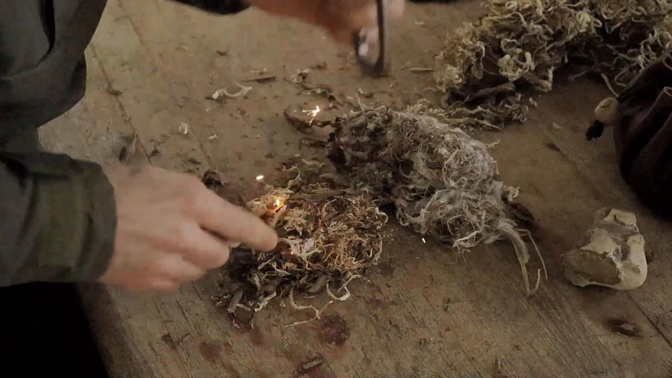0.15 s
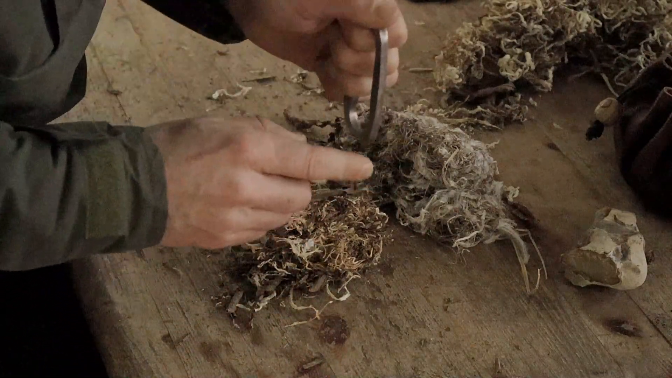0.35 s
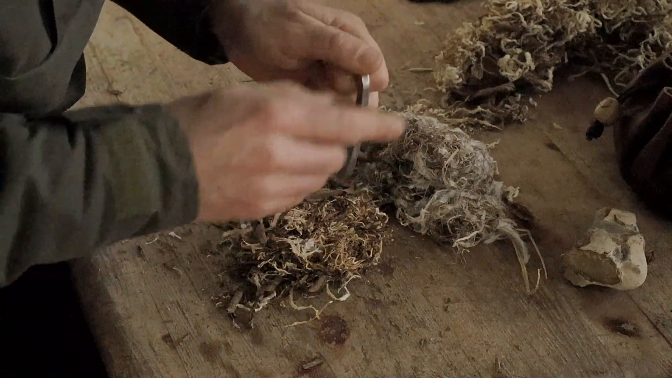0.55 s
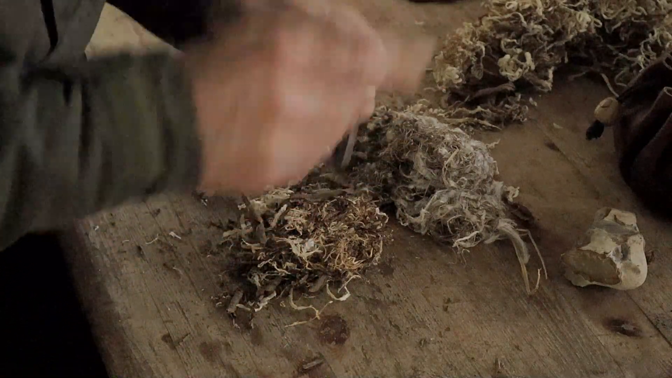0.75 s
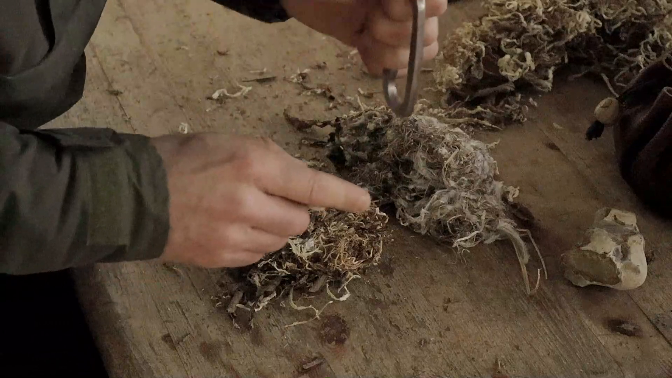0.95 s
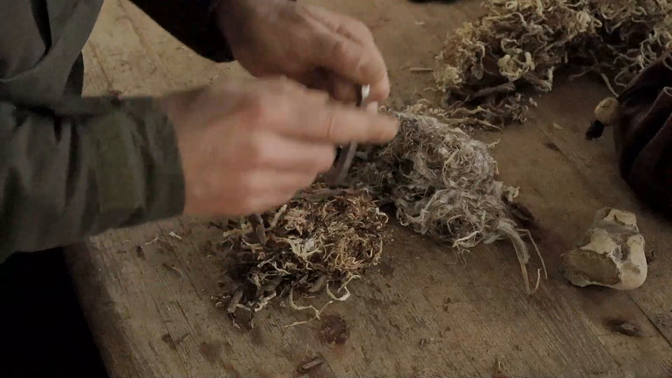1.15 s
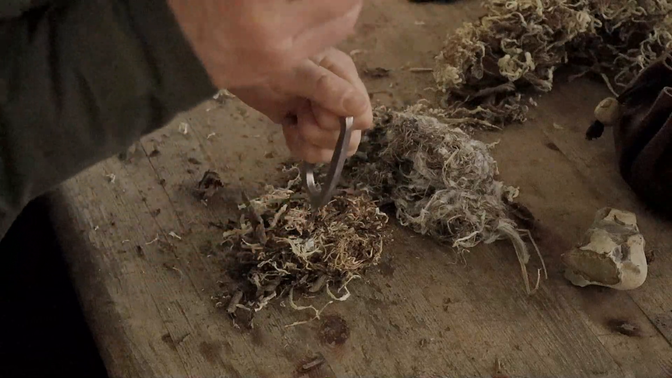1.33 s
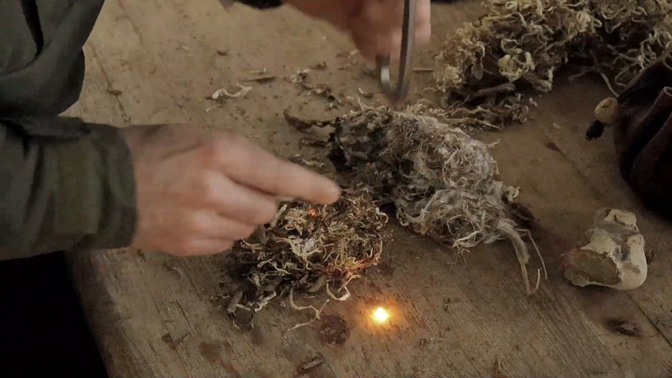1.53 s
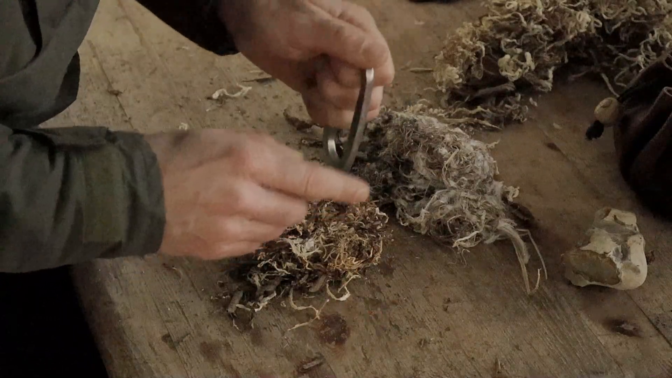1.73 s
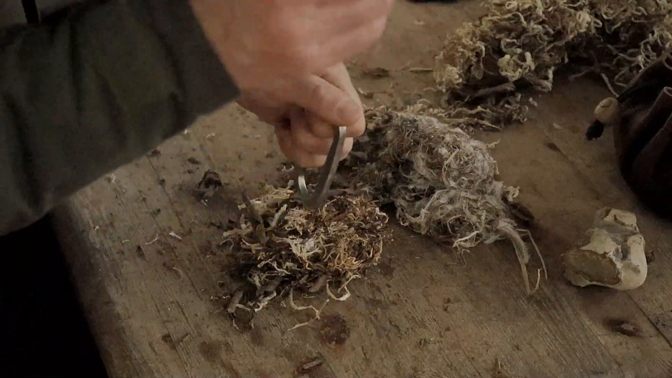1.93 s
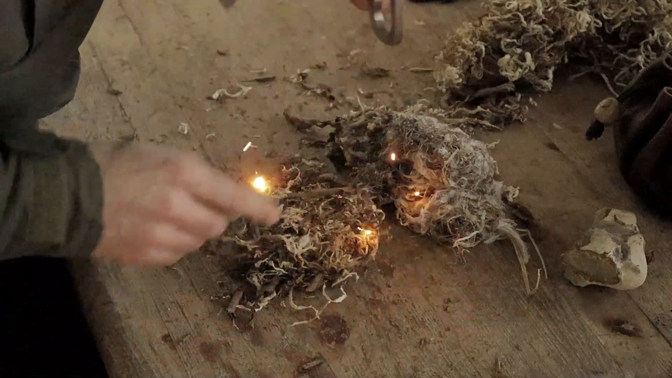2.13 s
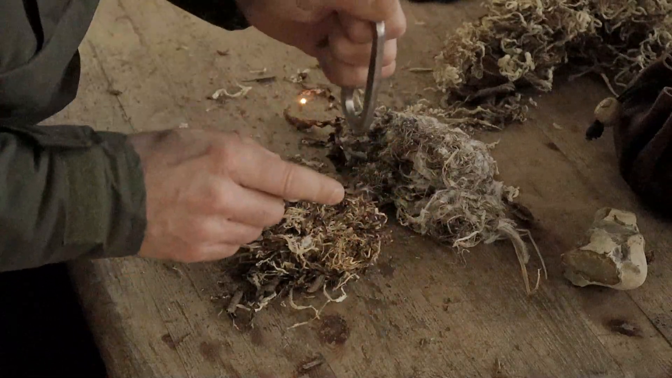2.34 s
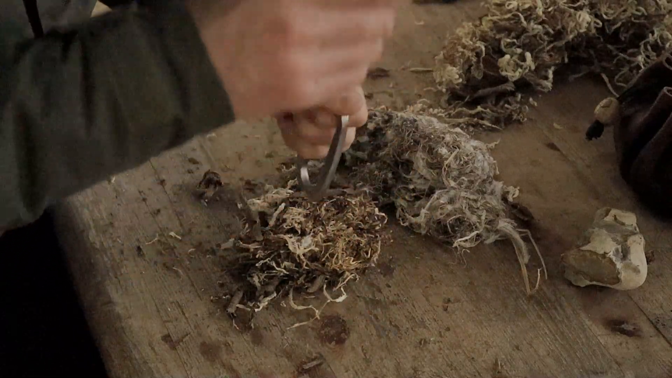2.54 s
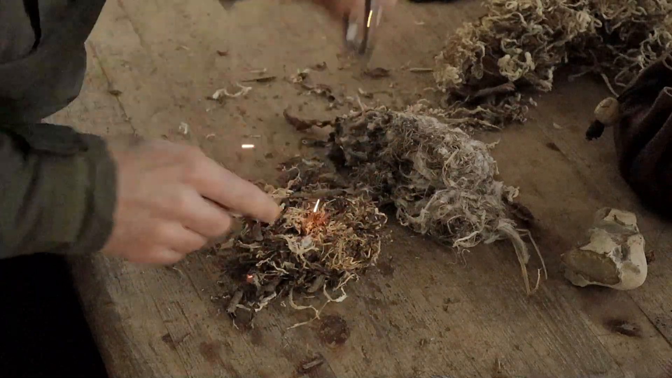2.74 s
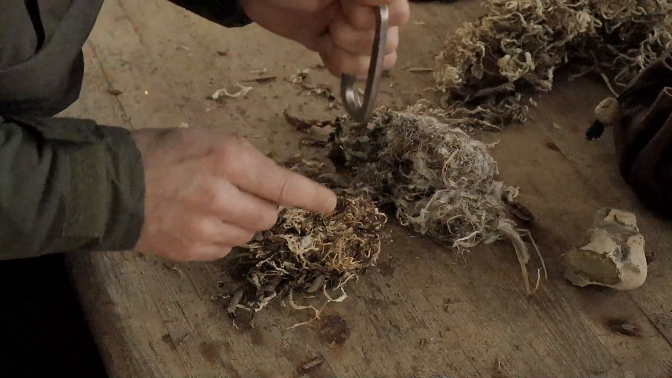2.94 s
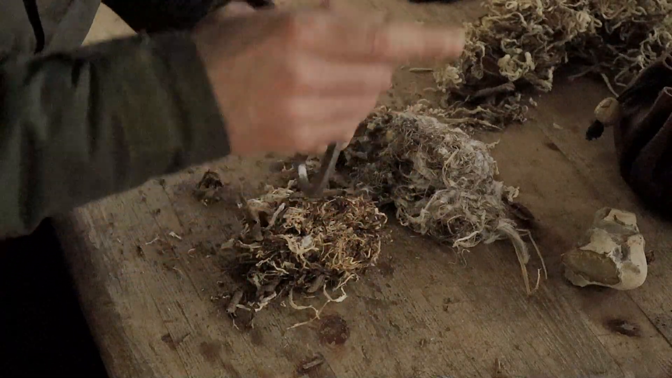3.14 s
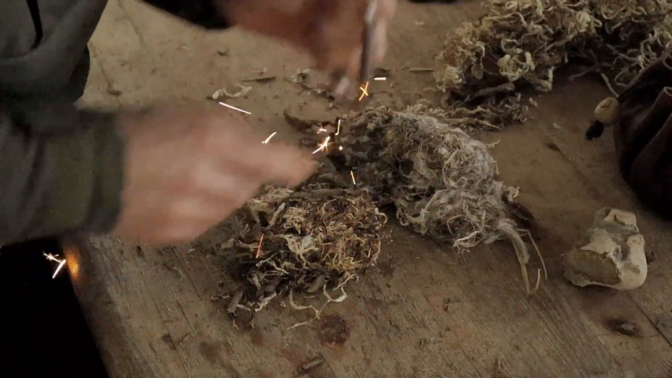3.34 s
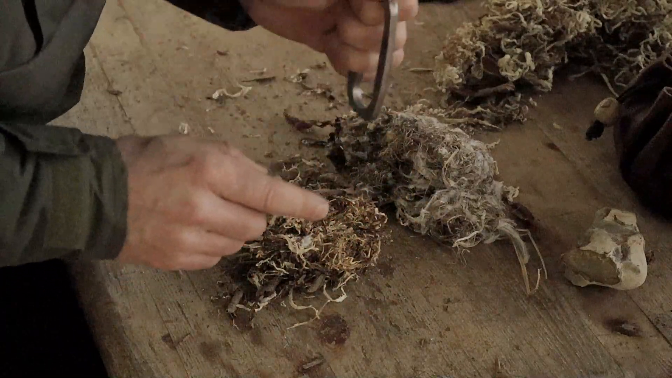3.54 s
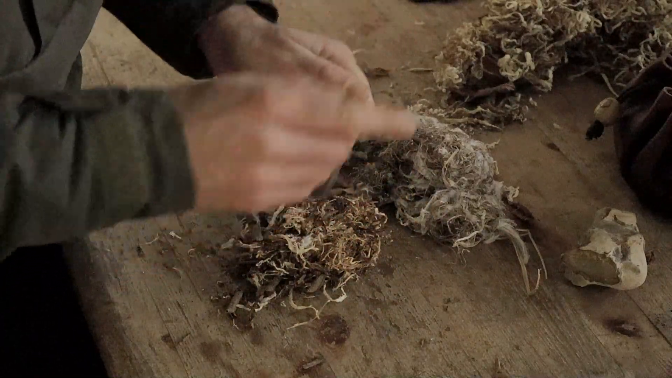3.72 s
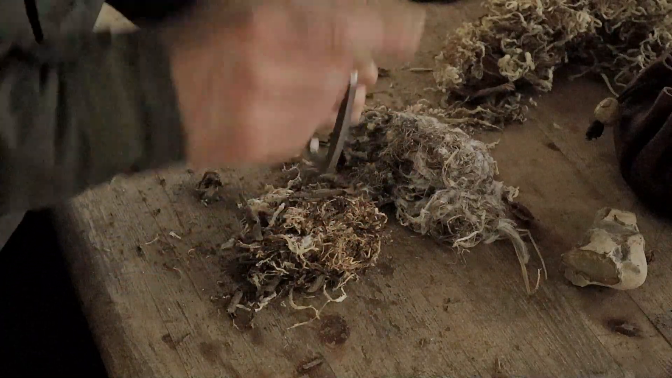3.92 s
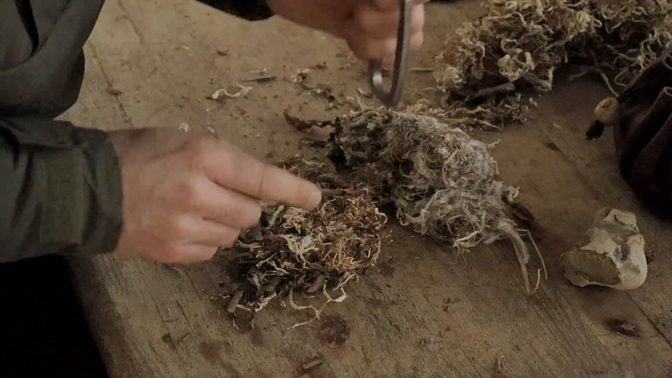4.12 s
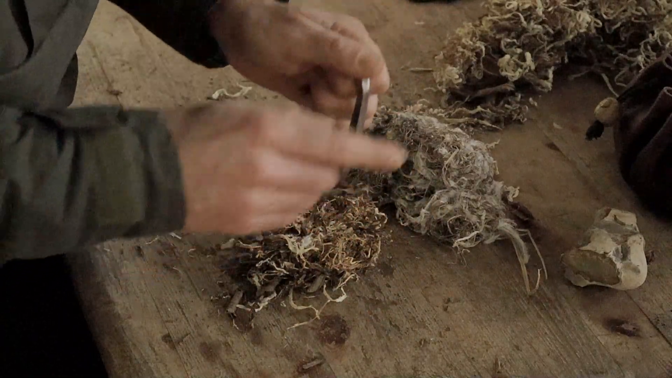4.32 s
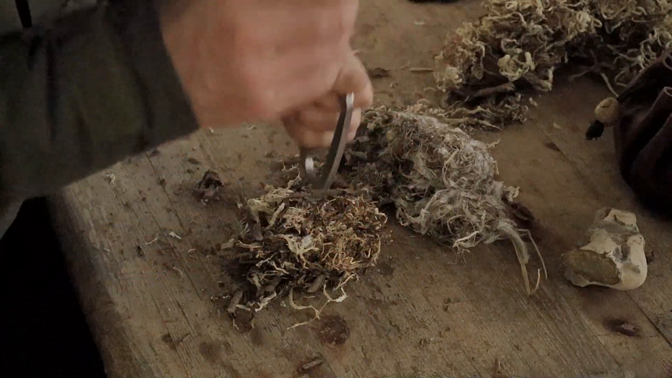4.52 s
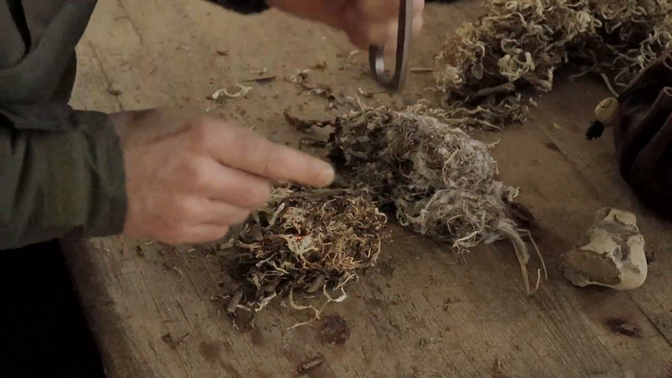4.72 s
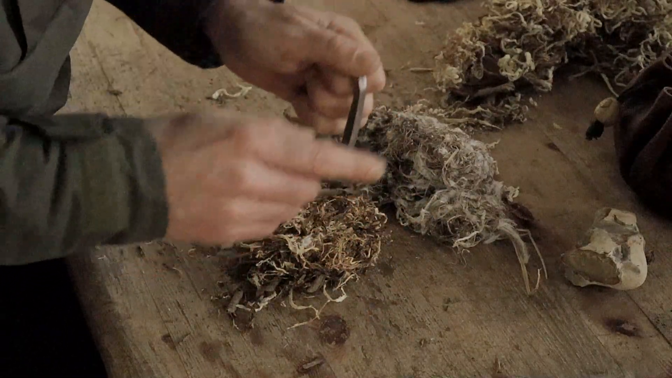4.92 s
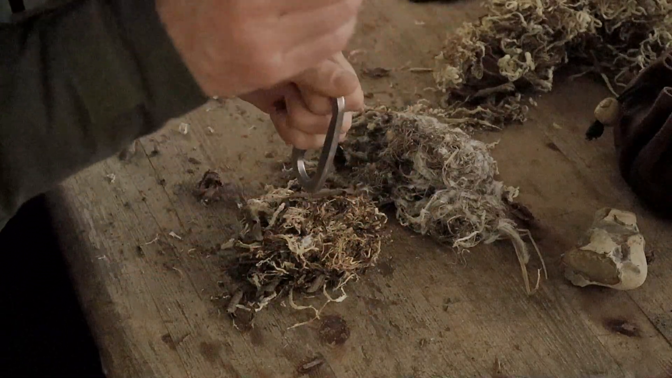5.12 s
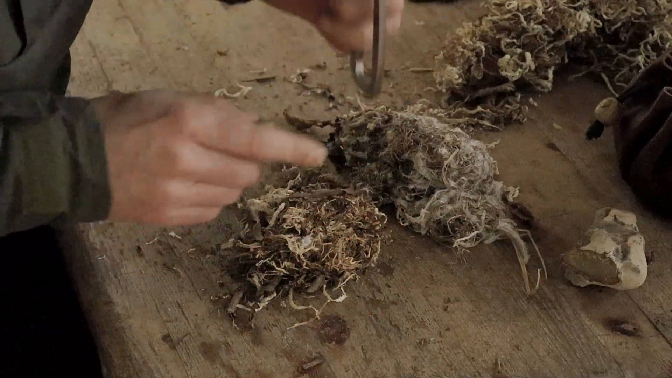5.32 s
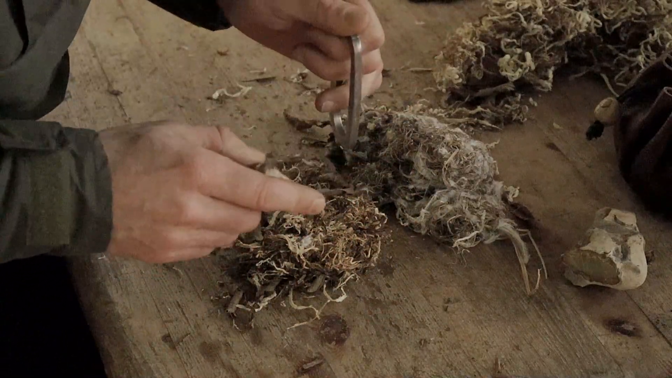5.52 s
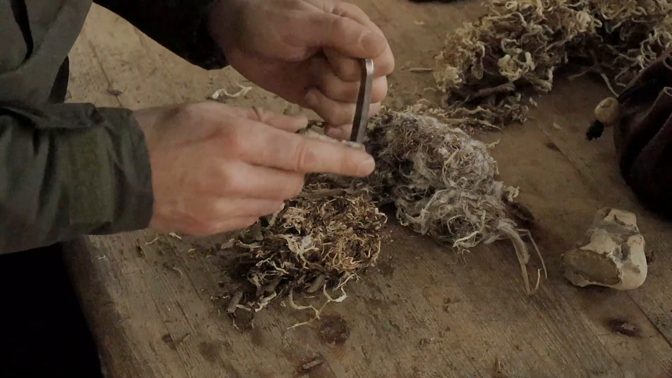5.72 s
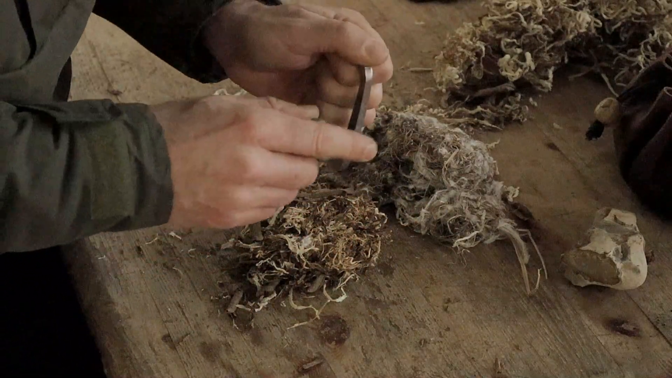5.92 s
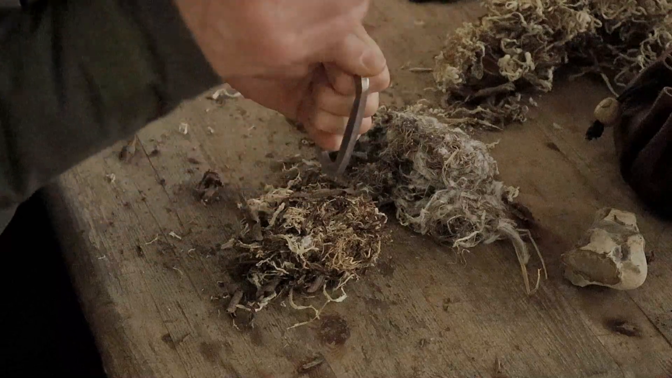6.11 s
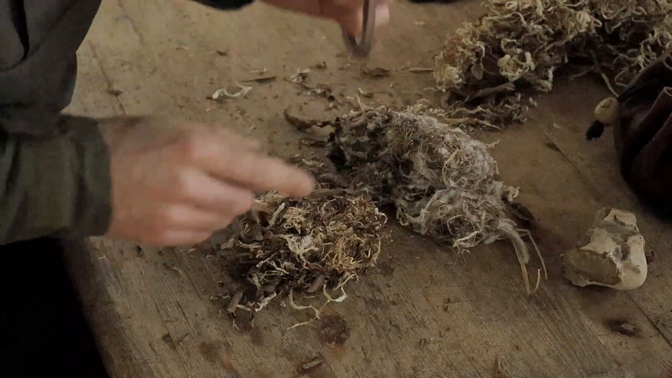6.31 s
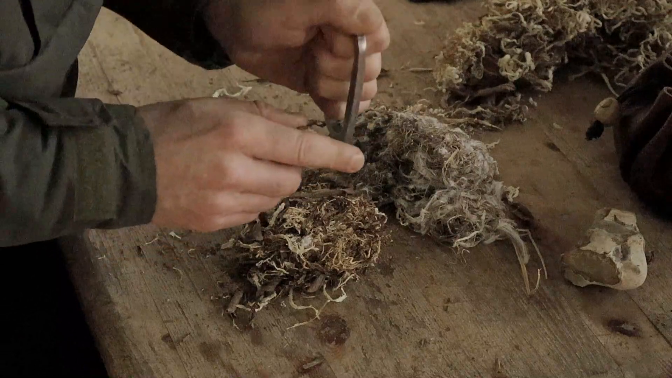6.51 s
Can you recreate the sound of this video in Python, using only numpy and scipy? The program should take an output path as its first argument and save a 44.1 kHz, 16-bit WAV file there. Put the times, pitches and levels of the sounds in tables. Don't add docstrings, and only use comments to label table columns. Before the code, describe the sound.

A hand-held steel striker snaps against flint again and again, close and overloaded, each scraping metallic click dying quickly over quiet room rumble.

```python
import sys
import numpy as np
from scipy import signal
from scipy.io import wavfile

SR = 44100
rng = np.random.default_rng(int(sys.argv[2]) if len(sys.argv) > 2 else 0)


def voltage_ratio(level):
    return 10 ** (np.asarray(level, float) / 20)


def materialize(psi):
    bounded = np.clip(np.atleast_2d(psi).T, -1, 1)
    quanta = np.round(bounded * 32767).astype(np.int16)
    wavfile.write(sys.argv[1], SR, quanta)


N = 289296


def at_hz(points, hz):
    table_hz, table_db = np.array(points).T[:2]
    return np.interp(np.log(hz), np.log(table_hz), table_db)


def rms_one(x):
    return x / np.sqrt(np.mean(x ** 2) + 1e-20)


def peak_one(x):
    return x / np.max(np.abs(x))


def butter(x, order, hz, kind="low"):
    return signal.sosfilt(signal.butter(order, hz, kind, fs=SR, output="sos"), x)


def ring(force, hz, t60):
    radius = voltage_ratio(-60 / (t60 * SR))
    turn = 2 * np.pi * hz / SR
    return signal.lfilter([0, np.sin(turn)], [1, -2 * radius * np.cos(turn), radius ** 2], force + 1e-18)


def bands(x, low_hz):
    edges = low_hz * 2 ** np.arange(0, np.log2(17000 / low_hz), .5)
    for k, (low, high) in enumerate(zip(edges, edges[1:])):
        yield np.sqrt(low * high), butter(x[k % 2], 2, [low, high], "band")


def hiss(spectrum, low_hz, patchy_db):
    out, knots = 0, np.arange(0, N + 2000, 2000)
    for hz, band in bands(rng.standard_normal((2, N)), low_hz):
        flicker = np.interp(np.arange(N), knots, rng.standard_normal(len(knots)))
        out = out + voltage_ratio(at_hz(spectrum, hz) + patchy_db * flicker) * band
    return rms_one(out)


def swell(s, width_s):
    return np.exp(-((np.arange(N) / SR - s) / width_s) ** 2)


# (time [s], strength [dB], place along the steel [0-1], slant of the edge [0-1],
# grip damping [factor])
BLOWS = [
    (0.1917, 4.5, .9, 0.7, 0.92),
    (0.8594, 3.5, 0.6, 1, .95),
    (1.4948, 5, 0.97, .8, 0.88),
    (2.1477, 4, 0.4, .5, 0.98),
    (2.79, 5, .65, 0.5, 1),
    (3.416, 5.5, .85, 1, 1),
    (4.0375, 3.5, 0.2, .2, .8),
    (4.6585, 4.5, .35, 0.3, .95),
    (5.2928, 5, .85, .05, .8),
    (6.298, 3.5, .15, .3, 1.6),
]
# (time [s], strength [dB], scrape [ms], grip damping [factor],
# main mode share [dB])
TOUCHES = [
    (0.4947, -19, 1.1, 0.8, -13),
    (0.5471, -44, 2.46, 1.4, -20),
    (0.5548, -45.5, 2.6, 1.3, -10),
    (0.5581, -41, 5.4, 1.4, -20),
    (5.875, -15, 1.1, 0.73, -4.5),
    (5.9074, -36, 2.4, 2.6, -5),
    (5.9327, -47, 2.6, 1.5, -9),
    (6.017, -36.5, 5.4, 1.9, -5),
]
SHARE_DB = [0.5, -12.5, -21, -15, -25, -4, -14.5]
PLACE_DB = [-1, 0.57, 8, 12.5, 19, 3.5, 3]
SLANT_DB = [-8, 13.5, -3.5, 0.85, 1.6, -8, 4.5]
TOUCH_SHARE_DB = [-6.5, -2.5, -15, -24, -15, -36]


def contacts():
    rows = []
    for s, db, place, slant, grip in BLOWS:
        shares = np.array(SHARE_DB) + place * np.array(PLACE_DB) + slant * np.array(SLANT_DB)
        scrape_ms = 3.05 / np.sqrt(grip)
        grit_db = -8 + 1.93 * db
        rows.append((s, db, scrape_ms, grip, grit_db, place, shares))
    partner_db, *others = TOUCH_SHARE_DB
    for s, db, scrape_ms, grip, main_db in TOUCHES:
        shares = np.array([main_db, main_db + partner_db, *others])
        rows.append((s, db, scrape_ms, grip, -8, 0.9, shares))
    return sorted(rows, key=lambda row: row[0])


def scrape(scrape_ms, chance):
    t = np.arange(len(chance[0])) / SR
    force = 0.15 * chance[0] * chance[1] ** 2 * np.exp(-(1000 * t / scrape_ms) ** 3)
    force[:3] = -0.95
    return force


# (frequency [Hz], level [dB], t60 [s])
STEEL = [
    [(4070, -1, .014), (3900, -9, .008)],
    [(4330, -1, .013)],
    [(2900, -1, .022), (1600, -14, .01), (3400, -9, .006)],
    [(4800, -5, .009), (5100, -4, .016)],
    [(7500, -1, .02), (7700, -7, .013)],
    [(9820, -2, .016), (9450, -14, .012)],
    [(11660, -1, .014)],
]
# (frequency [Hz], level [dB], t60 [s])
FREE = [
    (4100, -30, .42),
    (4335, -27, .34),
    (2900, -32, .2),
    (5110, -41, .42),
    (7520, -36, .32),
    (9790, -39, .26),
    (11650, -37, .2),
]
FREE_PLACE_DB = [-20, -14, 0.7, 1.5, 0.7, 0.7, 0.7]


def steel(force, damping, place, shares, chance):
    click = np.arange(len(force)) == 0
    detune = 1 + .004 * chance[0, -len(STEEL):]
    tremble = rms_one(butter(chance[1], 2, 60))
    out = 0
    for modes, free, place_db, share_db, shift in zip(STEEL, FREE, FREE_PLACE_DB, shares, detune):
        gain = voltage_ratio(share_db - max(shares))
        free_hz, free_db, free_t60 = free
        free_gain = gain * voltage_ratio(free_db + place_db * place - 14 * (damping - 0.5))
        wobble = .8 + .8 * np.roll(tremble, free_hz)
        out = out + free_gain * wobble * ring(click, free_hz * shift, free_t60 / np.clip(damping, .8, 2))
        for hz, mode_db, t60 in modes:
            held = ring(force, hz * shift, t60 / np.clip(damping, .6, 2))
            out = out + gain * voltage_ratio(mode_db) * peak_one(held)
    return out


# (frequency [Hz], level [dB per Hz])
GRIT = [(600, -28), (1200, -13), (2200, -21.5), (3200, -11.5), (4500, 0.5), (7000, 1), (12000, 5),
        (15500, -10)]


def grit(force, chance):
    t = np.arange(len(force)) / SR
    chips_t60 = .13
    chips = voltage_ratio(-27 - 60 * t / chips_t60) * butter(chance[2, ::-1], 2, 7500)
    scatter = force + chips
    return peak_one(sum(voltage_ratio(at_hz(GRIT, hz)) * band for hz, band in bands([scatter, scatter], 706)))


def thump(size):
    click = np.arange(size) == 0
    return ring(click, 100, 0.048) + 3.2 * ring(click, 520, 0.015) + 0.5 * ring(click, 170, 0.043)


def blow(row, chance):
    s, db, scrape_ms, damping, grit_db, place, shares = row
    force = scrape(scrape_ms, chance)
    body = steel(force, damping, place, shares, chance) + voltage_ratio(grit_db) * grit(force, chance)
    soft_hz = np.clip(17000 * voltage_ratio(0.39 * db), 5200, 20000)
    thin_hz = np.clip(900 * voltage_ratio(-.45 * db), 500, 2500)
    body = butter(body, 2, [thin_hz, soft_hz], "band")
    return voltage_ratio(db) * (peak_one(body) - voltage_ratio(-42 + 1.2 * db) * thump(len(force)))


def near_echoes(x, chance):
    t = np.arange(SR // 50) / SR
    echoes = chance[:len(t)] * np.exp(-t / 0.0022) * (t > .001)
    return x + voltage_ratio(-24) * signal.oaconvolve(x, echoes)[:len(x)]


def striker():
    size, lag_s = SR // 2, .0011
    rows = contacts()
    out = np.zeros(N + size)
    for row, chance in zip(rows, rng.standard_normal((len(rows), 3, size))):
        at = round((row[0] + lag_s) * SR)
        out[at:at + size] += near_echoes(blow(row, chance), chance[2])
    return butter(out[:N], 6, 14000)


# (time [s], peak level [dB])
SPARKS = [
    (2.198, -25),
    (6.5081, -78),
]


def sparks():
    t = np.arange(N) / SR
    burst = np.zeros(N)
    for s, db in SPARKS:
        burst += voltage_ratio(db) * (t >= s) * np.exp(-np.maximum(t - s, 0) / .0015)
    return butter(0.55 * burst * rng.standard_normal(N), 2, [6000, 14000], "band")


# (frequency [Hz], t60 [s])
ROOM_T60 = [(500, 0.04), (2000, 0.078), (3200, .085), (4500, 0.14), (9000, 0.095), (14000, 0.072)]


def room(x):
    t = np.arange(SR // 2) / SR
    echoes_per_s, first_wall_s = 8200, 0.006
    echoes = rng.standard_normal(len(t)) * (rng.random(len(t)) < echoes_per_s / SR)
    walls = echoes / (1 + np.exp(-(t - first_wall_s) / 0.0016))
    tail = 0
    for hz, band in bands([walls, walls], 500):
        fall_db = -60 * t / at_hz(ROOM_T60, hz)
        far = voltage_ratio(-27 + fall_db / 2.8)
        tail = tail + band * (voltage_ratio(fall_db) + far)
    tail = butter(tail, 4, 12800)
    near_wall_s, spread_s = 0.015, 0.00066
    slap = echoes * np.exp(-((t - near_wall_s) / spread_s) ** 2)
    slap = butter(slap, 2, 2600, "high")
    return signal.oaconvolve(x, voltage_ratio(-24) * tail + voltage_ratio(-30.5) * slap)[:N]


# (frequency [Hz], level [dB per Hz])
STROKE = [(500, -16), (1500, -0.5), (3500, 1.5), (6000, -6.5), (10000, -9), (15500, -13.5)]


def strokes():
    t = np.arange(N) / SR
    lead_s, rise_s, fall_s = 0.076, 0.07, 0.078
    speed = 0
    for s, db, *rest in BLOWS:
        moving = .5 + .5 * np.tanh((t - s + lead_s) / .025)
        speed = speed + voltage_ratio(db) * moving * np.exp(np.minimum((t - s) / rise_s, (s - t) / fall_s))
    return voltage_ratio(-54.5) * speed * hiss(STROKE, 400, patchy_db=2.5)


# (middle time [s], level [dB], length [s])
LIFTS = [(0.028, -74.5, .12), (0.713, -71, 0.089), (1.245, -66, 0.046), (1.356, -68.5, 0.11),
         (1.87, -79, 0.065), (1.99, -68.5, .12), (2.65, -68.5, .1), (3.178, -66, .06), (3.269, -67, 0.19),
         (3.865, -66.5, 0.13), (4.485, -68.5, 0.13), (5.121, -67.5, .12), (5.789, -71, .1),
         (6.052, -63.5, 0.066), (6.152, -63, 0.16), (6.44, -64.5, .05), (6.531, -71.5, .04)]
# (frequency [Hz], level [dB per Hz])
SWISH = [(1200, -9), (1800, -0.5), (3000, 0.5), (5000, -3), (8000, -19.5)]
# (frequency [Hz], level [dB per Hz])
RUSTLE = [(4000, -13.5), (6500, -5.5), (9000, 1.5), (12000, -4.5), (15500, -10)]


def sleeves():
    rub = np.sqrt(sum((voltage_ratio(db) * swell(s, length / 2)) ** 2 for s, db, length in LIFTS))
    swish = (voltage_ratio(-77) + rub) * hiss(SWISH, 610, patchy_db=-0.5)
    rustle = (voltage_ratio(-85) + voltage_ratio(-8.5) * rub) * hiss(RUSTLE, 2828, patchy_db=2.0)
    return swish + rustle


# (time [s], frequency [Hz], length [s], level [dB])
CREAKS = [
    (3.127, 247.5, 0.034, -56.5),
    (3.23, 160, .1, -58),
    (3.484, 166, 0.0705, -54.5),
]


def creaks():
    t = np.arange(N) / SR
    return sum(voltage_ratio(db) * swell(s, length / 2) * np.sin(2 * np.pi * hz * t) for s, hz, length, db in CREAKS)


# (frequency [Hz], level [dB per Hz])
AIR = [(12, -34), (20, -4), (70, 1), (161, -4), (300, -1.5), (890, -4), (2200, -12.5), (2860, -42.5)]
# (frequency [Hz], level [dB per Hz])
MIC_HISS = [(1500, -8.5), (2500, -1.5), (5000, -3.5), (9000, -12.5), (13000, -13.5), (16000, -12)]


def air():
    lead_s, width_s = 0.033, 0.19
    sway = sum(swell(s - lead_s, width_s) for s, *rest in BLOWS)
    rumble = voltage_ratio(-62 + 3.5 * sway) * hiss(AIR, 22, patchy_db=0.5)
    return rumble + voltage_ratio(-70) * hiss(MIC_HISS, 1414, patchy_db=0.1)


def scene():
    hits = striker()
    action = hits + sparks() + room(hits)
    background = strokes() + sleeves() + creaks() + air()
    return (action + background)[None]


def low_pass(x):
    return signal.sosfilt(signal.butter(12, 15870, fs=SR, output="sos"), x)


def record(dry):
    hard = np.tanh((dry / 0.87) * (1 + 0.95 * dry ** 2))
    hard = butter(hard, 1, 30, "high")
    hard = signal.sosfilt(signal.cheby2(8, 30, 16600, fs=SR, output="sos"), hard)
    mix = np.clip(hard, -1, 1)
    return low_pass(mix)


dry = scene()
out = record(dry)
materialize(out)
```